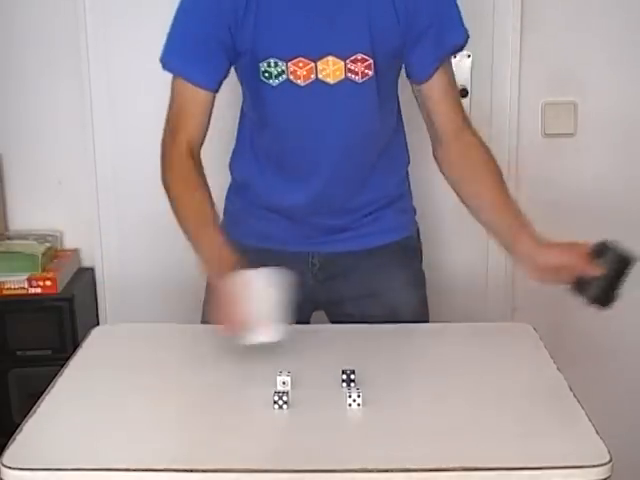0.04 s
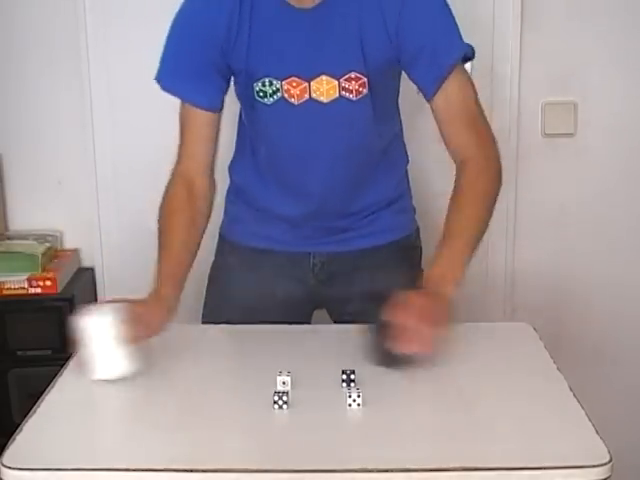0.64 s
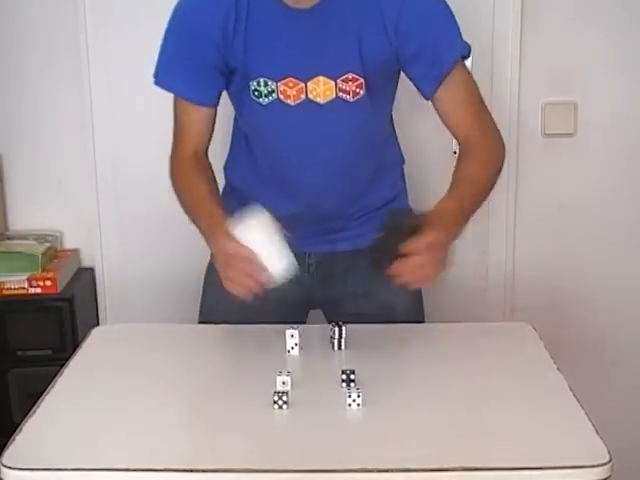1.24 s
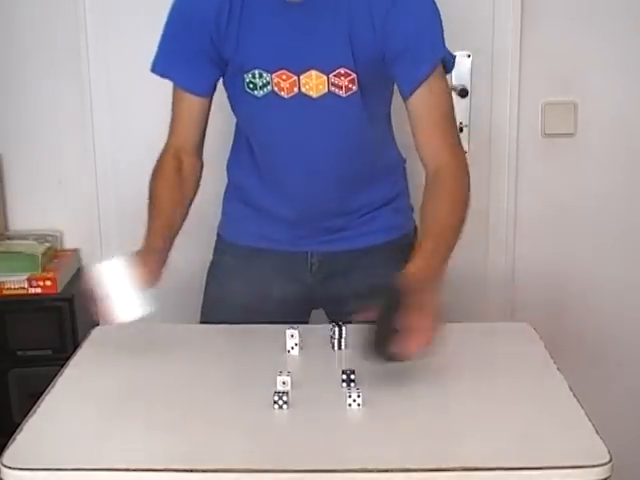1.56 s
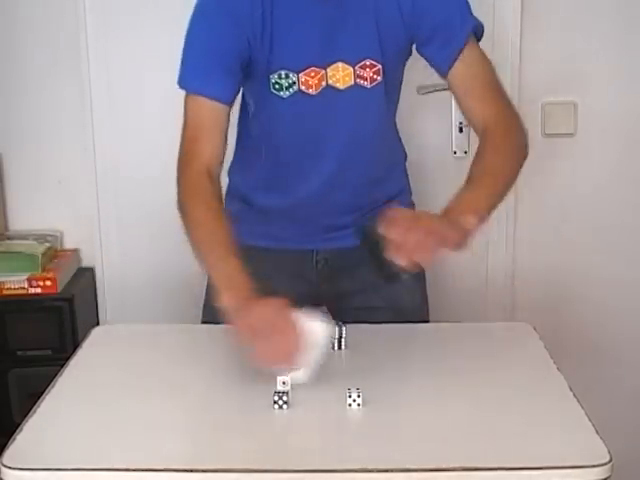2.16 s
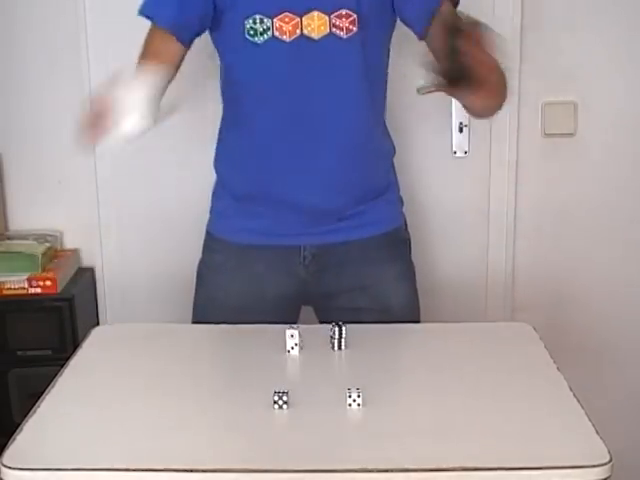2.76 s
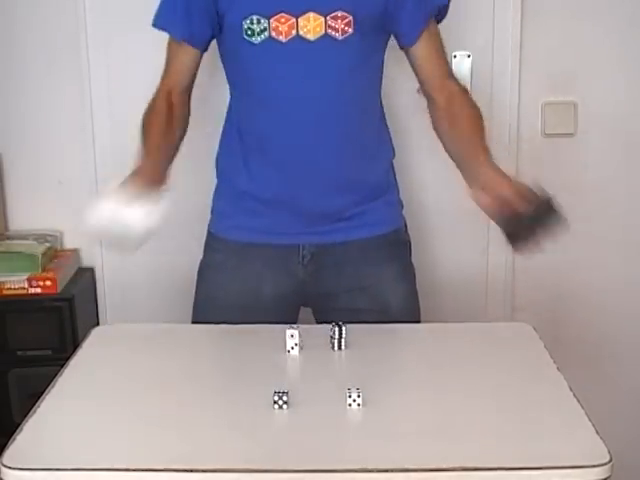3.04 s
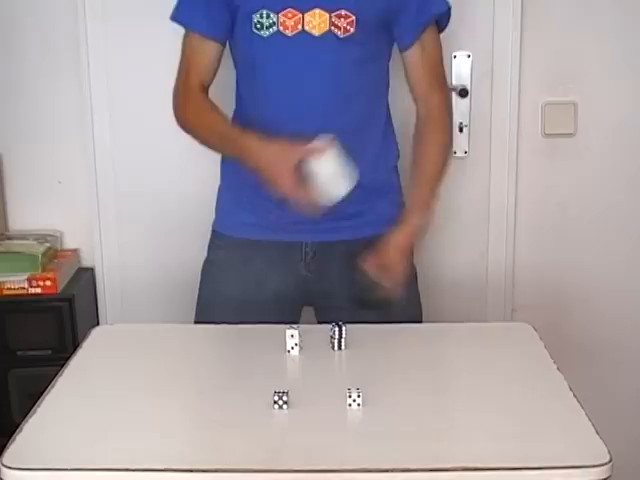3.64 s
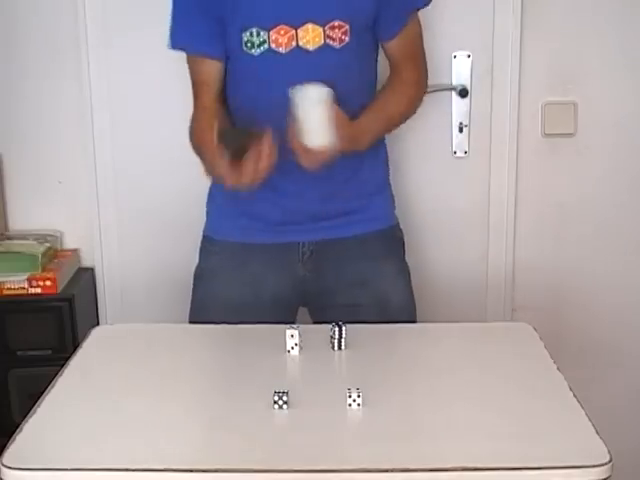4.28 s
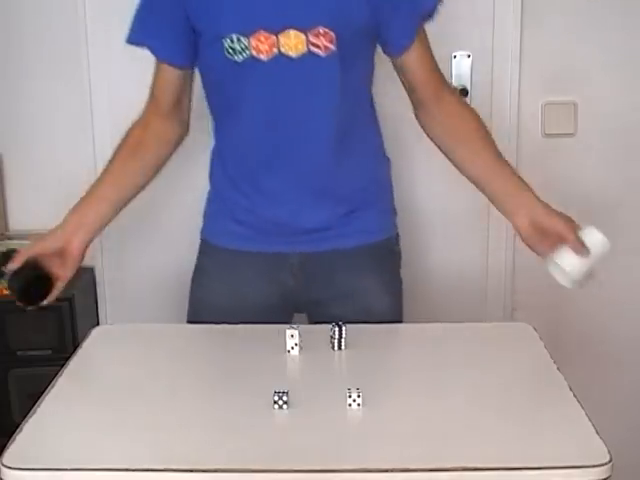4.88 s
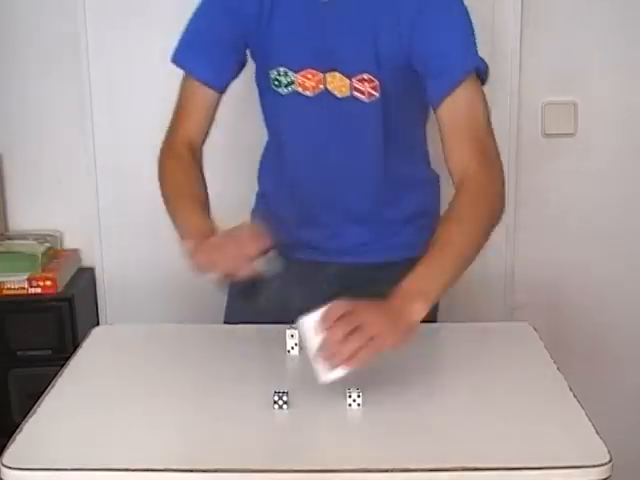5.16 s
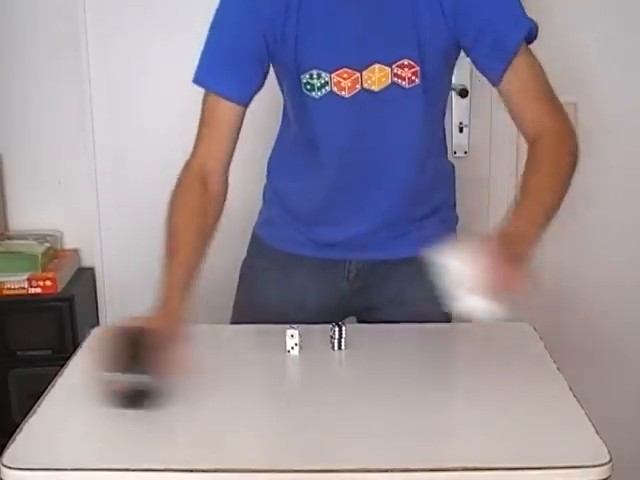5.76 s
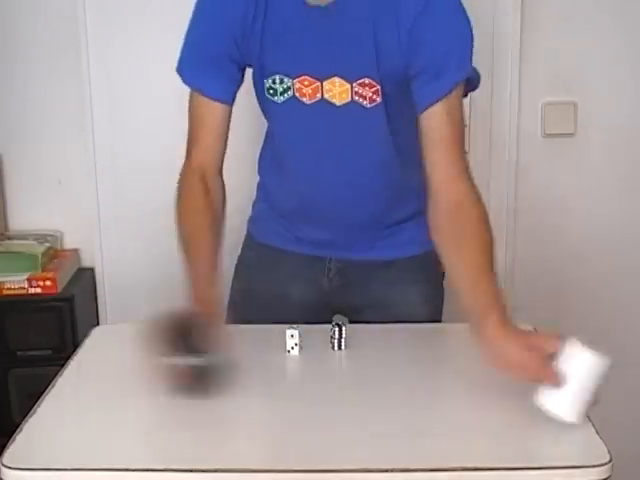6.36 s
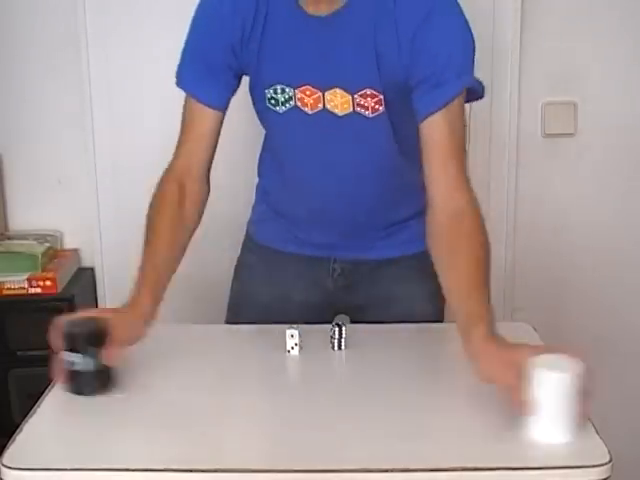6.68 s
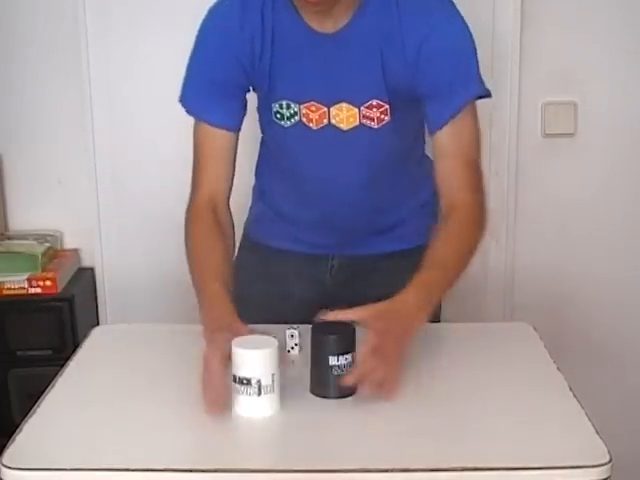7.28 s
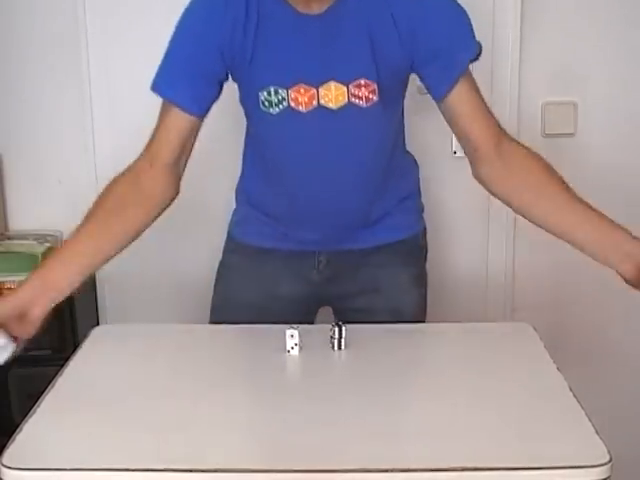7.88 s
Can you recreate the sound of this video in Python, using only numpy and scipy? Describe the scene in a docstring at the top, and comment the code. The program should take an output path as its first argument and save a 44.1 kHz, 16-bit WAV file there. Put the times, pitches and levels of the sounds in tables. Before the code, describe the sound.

Dice rattle and clack inside two plastic cups that are swung, knocked down and scraped across a table in a small room.

```python
"""A small bare room, where two plastic cups sweep mouth down over a table and scoop up dice.
The cups are swung and tossed, so the dice roll around inside and clack against the walls.
The air in a cup hoots, lower when the table closes its mouth. Rims knock and scrape on the
tabletop. Two microphones hear it all, with much of the room's echo and a faint hush."""
import sys
import numpy as np
from scipy import signal
from scipy.fft import rfft, irfft
from scipy.io import wavfile
from scipy.ndimage import uniform_filter1d

SR = 44100
rng = np.random.default_rng(int(sys.argv[2]) if len(sys.argv) > 2 else 0)


def generate_wav(sig):
    """Save sig (samples, or channels by samples) to the path in sys.argv[1] as 16-bit PCM at SR."""
    pcm = np.round(np.clip(np.atleast_2d(sig).T, -1, 1) * 32767).astype(np.int16)
    wavfile.write(sys.argv[1], SR, pcm)


N = 353682

# The tone of the room's hush. Each row: frequency in Hz, relative level in dB.
HUSH_TONE = [(30, -33), (75, -33.5), (115, -0.5), (150, -17), (220, -3), (1400, -3.5), (3200, -15),
             (10200, -21.5), (15000, -28)]
# How long the room echoes. Each row: frequency in Hz, seconds to fade by 60 dB.
ECHO_TIMES = [(150, 0.36), (400, 0.23), (1000, 0.32), (2800, .31), (7000, 0.33), (14000, 0.22)]
# How alike the room sounds left and right. Each row: frequency in Hz, likeness (1 same, 0 unrelated).
LIKENESS = [(600, 0.88), (3000, 0.77), (6000, 0.72), (13000, -.1)]
# The unequal microphones. Each row: frequency in Hz, left level over right in dB.
MIC_BALANCE = [(600, -1.8), (1300, -0.6), (9000, -0.5), (13000, 1.5)]
# The ringing notes of cup wall and tabletop. Each row: pitch in Hz, width in Hz, boost in dB.
CUP_NOTES = [(1387, 105, 8), (3277, 69, -3), (3524, 98, 5.5)]
TABLE_NOTES = [(205, 60, 12), (309, 74, 16.5), (385, 29, 10), (450, 11, 5)]
# The tone of each kind of contact. Each row: frequency in Hz, relative level in dB.
ROLL_TONE = [(100, -40.5), (450, -11), (800, 4), (1400, 0), (2500, -1.5), (9500, -18), (15000, -43.5)]
SCRAPE_TONE = [(80, -42), (250, -32), (500, -9), (700, -3), (1000, -2), (1600, -6), (3000, -11.5),
               (9500, -18.5), (15000, -42.5)]
KNOCK_TONE = [(80, -29.5), (200, -15), (400, -11.5), (600, 7), (1000, -1), (2000, -17), (4000, -23.5),
              (12000, -51.5)]
CLICK_TONE = [(100, -43), (300, -20.5), (550, -6.5), (900, 1), (1500, 0), (2400, 1), (4000, -4),
              (8000, -9.5), (10000, -13), (12500, -25), (16000, -49)]
# Dice rolling round a lifted cup. Each row: start in seconds, length in seconds, level in dB.
ROLLS = [(0, .16, -24), (2.16, 0.051, -40.5), (2.39, 0.071, -18), (2.648, .03, -28), (2.7, 0.075, -20.5),
         (2.92, .13, -23), (3.17, 0.099, -35.5), (3.22, 0.22, -25), (3.44, 0.2, -30.5),
         (3.685, 0.086, -28.5), (4.155, 0.19, -40), (4.32, 0.23, -22), (4.61, 0.14, -22),
         (4.8, 0.14, -25.5), (5.082, 0.17, -34.5), (5.38, .11, -21), (5.55, 0.073, -21), (5.89, 0.3, -28),
         (6.085, 0.031, -21.5), (7.865, 0.15, -31)]
# A cup sliding mouth down. Each row: start in seconds, length in seconds, level in dB,
# pitch of its air on landing in Hz.
SLIDES = [(0.214, .22, -23.5, 670), (0.495, .13, -22, 633), (0.629, 0.22, -25.5, 678),
          (1.686, 0.2, -26, 734), (2.206, .17, -25, 734), (5.26, .14, -25.5, 735), (5.73, 0.16, -23.5, 780),
          (6.235, .08, -28, 778), (6.331, 0.19, -31, 650), (6.517, 0.19, -24, 728),
          (6.664, 0.16, -24.5, 650), (6.799, 0.16, -29.5, 748), (6.97, .18, -47.5, 680),
          (7.363, 0.076, -25, 625), (7.458, 0.3, -24.5, 648), (7.691, 0.19, -26, 731)]
# A rim landing on the table. Each row: start in seconds, level in dB.
RIM_KNOCKS = [(.231, -12.5), (.327, -27), (.385, -25.5), (.494, -16), (.724, -16), (.748, -17.5),
              (.828, -13), (1.691, -6), (1.736, -19), (2.199, -14.5), (2.221, -7), (2.332, -16.5),
              (5.248, -12), (5.266, -7.5), (5.716, -25), (5.727, -9.5), (6.242, -15), (6.327, -13),
              (6.537, -12.5), (6.609, -17.5), (6.689, -24), (7.04, -47.5), (7.11, -40.5), (7.37, -27.5),
              (7.465, -15), (7.559, -29), (7.649, -21.5)]
# Dice hitting a cup wall or each other. Each row: start in seconds, level in dB,
# extra hollowness in dB, extra brightness in dB.
DICE_HITS = [(.002, -5, 0, 3), (.015, -15.5, 10.5, -7), (0.058, -8.5, 1.5, 6), (0.174, -5.5, 7, 2),
             (.212, 0.5, 1.5, 2.5), (0.31, 1, 6.5, 1.5), (.414, -6, 10, 7), (0.42, 1.5, 4.5, -4),
             (.533, -7, 6.5, 5), (0.614, -9.5, 6, 3), (.667, -2.5, 2.5, 7.5), (.696, -12.5, 3, 7.5),
             (.829, 3.5, 5, -6.5), (0.886, 4.5, -1.5, -5), (0.964, 3, -3.5, -10), (.984, 0.5, -5.5, -5),
             (1.692, -8, 6, -3.5), (1.737, -3, 6, 0), (1.857, 1, 1, 0.5), (2.198, -5, 4.5, -2.5),
             (2.221, -2, 6, 2.5), (2.395, 2, -7, -1.5), (2.426, -1.5, 3.5, -4.5), (2.654, -39, 20.5, -13),
             (2.701, -2, 3.5, 1.5), (2.843, -2, 0, 5), (2.941, 2.5, -3.5, -7), (3.175, -36.5, 17.5, -10),
             (3.223, -4, 4, -2), (3.358, -14.5, 10, -2), (3.451, 2, -3.5, -0.5), (3.691, -8.5, -1, -3),
             (4.158, -26, 4.5, 14), (4.217, -27, -4, 14.5), (4.233, -15.5, 1, 3.5), (4.283, -16, 6, -3.5),
             (4.325, -6.5, 5.5, 6.5), (4.338, -7, -4.5, 7.5), (4.387, 0.5, 2, -3.5), (4.410, 0.5, -4, -6),
             (4.425, 0, -18, -1), (4.439, -5, 10, 7.5), (4.616, -7, 2.5, -6), (4.666, 1, 1, -9),
             (4.705, -1.5, -2.5, 1.5), (4.755, -3.5, 8.5, 4.5), (4.805, -4.5, 1, 3.5),
             (4.839, -4.5, -1, -3), (4.889, -2.5, 3.5, 4), (5.248, -12.5, 3, -1.5), (5.267, -6, 10, 0.5),
             (5.381, 2, 0.5, 4), (5.473, -5, -2, -2.5), (5.56, -21, -5, 0), (5.716, -17.5, 0, 5),
             (5.729, -1, 4.5, 1.5), (5.872, 3, -0.5, 0.5), (5.919, -1.5, -6.5, 5.5), (5.959, -4, -2.5, 2),
             (6.092, -3, -1.5, -1), (6.245, -1, 1.5, -2), (6.279, -3, 2, 4), (6.368, -3.5, 10, 5.5),
             (6.389, 2, -6.5, -1.5), (6.464, 1, 1.5, 5.5), (6.664, -6, 5, 8), (6.727, -4, -2, 6.5),
             (6.797, 4.5, -4.5, -7), (6.829, -1.5, 4.5, -11), (6.869, 1, 3.5, -4.5),
             (7.364, -6.5, 1, -11.5), (7.443, -3.5, 5, 13), (7.469, 2, -3, -13), (7.557, 4.5, 1, 1),
             (7.680, -2.5, 0.5, 5), (7.704, -0.5, 8.5, 5.5), (7.769, -6.5, 3.5, 0.5), (7.824, -5, 5, -1),
             (7.872, -7, 3.5, 2), (7.888, 4.5, 0, 0)]
# Where a hit sounds hollow or bright. Each row: frequency in Hz, share of the extra dB it gets.
HOLLOW_BAND = [(400, .6), (900, 1), (1700, 1), (2800, 0)]
BRIGHT_BAND = [(3000, 0), (7000, 1)]


def gain_of(db):
    """Turn decibels into a number to multiply by."""
    return 10 ** (np.asarray(db) / 20)


def unit_level(x):
    """Scale a signal to an average (rms) level of 1."""
    return x / np.sqrt(np.mean(x ** 2) + 1e-20)


def look_up(table, hz):
    """Read between a table's rows, giving each octave equal space."""
    row_hz, values = np.transpose(table)
    return np.interp(np.log(hz + 1), np.log(row_hz + 1), values)


def add(mix, start_s, sound):
    """Mix a sound in at its start time."""
    part = mix[max(round(start_s * SR), 0):][:len(sound)]
    part += sound[:len(part)]


def with_tone(x, tone, size=4096):
    """Filter a sound to follow a tone table, with nothing heard ahead of a hit."""
    hz = abs(np.fft.fftfreq(size, 1 / SR))
    log_gain = np.log(gain_of(look_up(tone, hz)))
    taps = np.fft.ifft(np.exp(np.conj(signal.hilbert(log_gain)))).real[:size // 2]
    return signal.oaconvolve(x, taps / np.linalg.norm(taps))[:len(x)]


def resonate(x, hz, width_hz):
    """Ring at one steady or moving pitch; a narrower width rings longer."""
    decay = np.exp(-np.pi * width_hz / SR)
    if np.ndim(hz) == 0:
        return 2 * signal.lfilter([1 - decay], [1, -decay * np.exp(2j * np.pi * hz / SR)], x + 1e-18).real
    turn = np.exp(2j * np.pi * np.cumsum(hz) / SR)
    return 2 * (turn * signal.lfilter([1 - decay], [1, -decay], x / turn + 1e-18)).real


def ring(x, notes):
    """A struck object rings at all its notes at once."""
    return sum(gain_of(db) * resonate(x, hz, width_hz) for hz, width_hz, db in notes)


def loudness(moves, shape):
    """Loudness over time of moves that share one shape, silent between them."""
    level = np.zeros(N)
    for start_s, length_s, db, *_ in moves:
        add(level, start_s, gain_of(db) * shape(np.arange(0, length_s, 1 / SR), length_s))
    return uniform_filter1d(level, size=200)


def tiny_taps(per_s, spread_db):
    """Many tiny contacts of uneven strength at random times."""
    chance, strength = rng.random((2, N))
    sign = rng.choice([-1., 1.], N)
    return unit_level((chance < per_s / SR) * sign * gain_of(spread_db * strength))


def left_and_right(spectra, hz):
    """Blend two unrelated sounds into a partly alike left and right."""
    alike = look_up(LIKENESS, hz)[:, None]
    shared = np.sqrt((1 + alike) / 2) * spectra[0]
    apart = np.sqrt((1 - alike) / 2) * spectra[1]
    return np.array([shared + apart, shared - apart])


def room_hush(level_db=-61.5):
    """The faint steady noise of the room."""
    hz, _, spectra = signal.stft(rng.standard_normal((2, N)), SR, nperseg=2048)
    spectra = left_and_right(spectra, hz) * gain_of(look_up(HUSH_TONE, hz))[:, None]
    return gain_of(level_db) * unit_level(signal.istft(spectra, SR)[1][:, :N])


def room_echo(x, first_s=.0019, near_db=4, near_s=0.0013, size=24000, spacing=12):
    """Dense echoes, first from the table and the player; each pitch fades at its own speed."""
    echoes = np.zeros((2, size))
    slots = np.arange(0, size - spacing, spacing)
    arrivals = slots + rng.integers(0, spacing, (2, len(slots)))
    np.put_along_axis(echoes, arrivals, rng.standard_normal(arrivals.shape), 1)
    delay_s = np.arange(size) / SR
    echoes *= (delay_s > first_s) * gain_of(near_db * np.exp(-delay_s / near_s))
    hz, t, spectra = signal.stft(echoes, SR, nperseg=256)
    fade = 10 ** (-3 * t / look_up(ECHO_TIMES, hz)[:, None])
    tail = signal.istft(left_and_right(spectra, hz) * fade, SR)[1]
    return signal.oaconvolve(x[None], tail / np.linalg.norm(tail[0]), axes=1)[:, :N]


def moving_echo(x, patterns=7, patterns_per_s=14):
    """The cups keep moving, so their echoes pass from one pattern to the next."""
    place = np.arange(N) / SR * patterns_per_s
    distances = [abs((place - k + patterns / 2) % patterns - patterns / 2) for k in range(patterns)]
    return sum(room_echo(x * np.cos(np.pi / 2 * np.minimum(away, 1))) for away in distances)


def cup_air_pitch(open_hz=841, sag_hz_per_s=500, reopen_s=0.03, waver=0.041):
    """The hoot wavers with the grip, sags while the table closes the cup and climbs as it lifts."""
    t = np.arange(N) / SR
    slow_noise = uniform_filter1d(rng.standard_normal(N), size=2500)
    grip = unit_level(uniform_filter1d(slow_noise, size=2500))
    hz = np.full(N, float(open_hz))
    for start_s, length_s, _, landing_hz in SLIDES:
        during = (t >= start_s) & (t <= start_s + length_s)
        closed = np.minimum((start_s + length_s - t[during]) / reopen_s, 1)
        closed_hz = landing_hz - sag_hz_per_s * (t[during] - start_s)
        hz[during] += closed * (closed_hz - hz[during])
    return uniform_filter1d(hz * (1 + waver * grip), size=400)


def in_cup(contact, air_hz, air_db, wall_db, air_width_hz):
    """A contact makes the cup's air hoot and its wall ring; all three are heard."""
    hoot = gain_of(air_db) * resonate(contact, air_hz, air_width_hz)
    return contact + hoot + gain_of(wall_db) * ring(contact, CUP_NOTES)


def roll_shape(t, length_s, skew=0.46, roundness=0.56):
    """A roll's loudness peaks early: the dice pick up speed quickly and run out slowly."""
    return abs(np.sin(np.pi * (t / length_s) ** skew)) ** roundness


def rolling_dice(air_hz, level_db=-3):
    """Dice pressed to the wall by the swing tumble softly over their edges."""
    tumble = with_tone(tiny_taps(per_s=220, spread_db=15), ROLL_TONE)
    tumble = in_cup(tumble, air_hz, air_db=13.5, wall_db=-6.5, air_width_hz=59)
    return gain_of(level_db) * unit_level(tumble) * loudness(ROLLS, roll_shape)


def slide_shape(t, length_s, landing_db=9, settle_s=0.011, lift_s=0.072):
    """A cup rubs hardest as it lands, settles, then fades as it lifts off."""
    return gain_of(landing_db * np.exp(-t / settle_s)) * np.minimum((length_s - t) / lift_s, 1)


def sliding_cups(air_hz, level_db=-1, table_db=-7, stutter_db=5, stutter_hz=32):
    """Rim and dice catch and slip on the table; the closed cup hoots sharply."""
    rub = with_tone(tiny_taps(per_s=500, spread_db=11), SCRAPE_TONE)
    rub = rub + gain_of(table_db) * ring(rub, TABLE_NOTES)
    rub = in_cup(rub, air_hz, air_db=15, wall_db=-17, air_width_hz=38)
    wander = unit_level(uniform_filter1d(rng.standard_normal(N), size=1500))
    slips = np.cumsum(stutter_hz * (1 + .5 * wander)) / SR
    stutter = gain_of(stutter_db * np.sin(2 * np.pi * slips))
    return gain_of(level_db) * unit_level(rub * stutter) * loudness(SLIDES, slide_shape)


def knocking_rims(air_hz, level_db=6, rock_s=0.0098, rock_db=-3):
    """A landing rim thumps the table and the trapped air, then rocks onto its other edge."""
    blows = np.zeros(N)
    for start_s, db in RIM_KNOCKS:
        add(blows, start_s, gain_of([db]))
        add(blows, start_s + rock_s * rng.uniform(0.781, 1.16), gain_of([db + rock_db]))
    blows = with_tone(blows, KNOCK_TONE)
    thumps = blows + ring(blows, TABLE_NOTES)
    return gain_of(level_db) * in_cup(thumps, air_hz, air_db=13, wall_db=3, air_width_hz=54)


def die_click(hollow_db, bright_db, spot_hz, fade_s, evenness, spot_db=4, spot_width=0.035, size=512):
    """One short, hard contact: the struck spot gives it a pitch, and chance varies its tone."""
    t, hz = np.arange(size) / SR, np.fft.rfftfreq(size, 1 / SR)
    burst = rng.standard_normal(size) * np.exp(-t / fade_s)
    spectrum = rfft(np.roll(burst, size // 8))
    spectrum /= abs(spectrum) ** evenness  # smooth out chance peaks and dips
    spectrum /= np.sqrt(np.mean(abs(spectrum) ** 2))
    spot = 1 + gain_of(spot_db) / (1 + 2j * (hz / spot_hz - 1) / spot_width) / 2
    tone_db = look_up(HOLLOW_BAND, hz) * hollow_db + look_up(BRIGHT_BAND, hz) * bright_db
    return irfft(spectrum * spot * gain_of(tone_db))


def bouncing_dice(belly_hz=2200, lip_hz=3536, bounces=3, gap_s=.009, bounce_db=-10, loss_db=2):
    """Each die hits the wall, then chatters against it and the other dice in weaker bounces."""
    contacts = np.zeros(N)
    for start_s, db, hollow_db, bright_db in DICE_HITS:
        # hollow hits land on the cup's belly, the others near its stiffer lip
        spot_hz = (belly_hz if hollow_db > 0.5 else lip_hz) * rng.normal(1, 0.021)
        hit = die_click(hollow_db, bright_db, spot_hz, fade_s=0.0013, evenness=0.79)
        add(contacts, start_s - .0009, gain_of(db) * hit)
        delays_s = np.cumsum(gap_s * rng.uniform(.4, 1.6, bounces))
        for k, delay_s in enumerate(delays_s):
            bounce_hz = spot_hz * rng.uniform(.55, 0.74)
            bounce = die_click(hollow_db, bright_db, bounce_hz, fade_s=0.00045, evenness=0.52)
            add(contacts, start_s + delay_s, gain_of(db + bounce_db - k * loss_db) * bounce)
    return with_tone(contacts, CLICK_TONE)


def clacking_dice(air_hz, level_db=10):
    """Dice make a lifted cup hoot and ring freely; the table seals its mouth and dulls its wall."""
    clicks = bouncing_dice()
    lifted = loudness(ROLLS, roll_shape) > gain_of(-70)  # a cup counts as lifted while dice roll
    hoot = resonate(clicks * gain_of(np.where(lifted, 2, -12)), air_hz, width_hz=70)
    wall = ring(clicks * gain_of(np.where(lifted, -2, -8)), CUP_NOTES)
    return gain_of(level_db) * (clicks + hoot + wall)


def scene(direct_db=-4, echo_db=1):
    """Cups and dice at the table, with the room around them."""
    air_hz = cup_air_pitch()
    direct = clacking_dice(air_hz) + knocking_rims(air_hz) + sliding_cups(air_hz) + rolling_dice(air_hz)
    return gain_of(direct_db) * direct + gain_of(echo_db) * moving_echo(direct) + room_hush()


def record(dry, overload_level=0.66, bump_db=-6, bump_hz=70, top_hz=16000):
    """Two slightly unequal microphones overload on the hardest hits; the highest treble is cut."""
    lean_db = look_up(MIC_BALANCE, np.fft.rfftfreq(N, 1 / SR)) / 2
    mics = irfft(rfft(dry) * gain_of([lean_db, -lean_db]), N)
    # overload shifts the wave to one side for a moment: a short low bump
    excess = np.maximum(abs(mics) - overload_level, 0)
    bump = signal.lfilter(*signal.butter(2, bump_hz, fs=SR), excess)
    mics = np.clip(mics - gain_of(bump_db) * bump, -1, 1)
    treble_cut = signal.firwin(401, top_hz, window=("kaiser", 9), fs=SR)
    return signal.oaconvolve(mics, treble_cut[None], "same", axes=1)


dry = scene()
out = record(dry)
generate_wav(out)
```